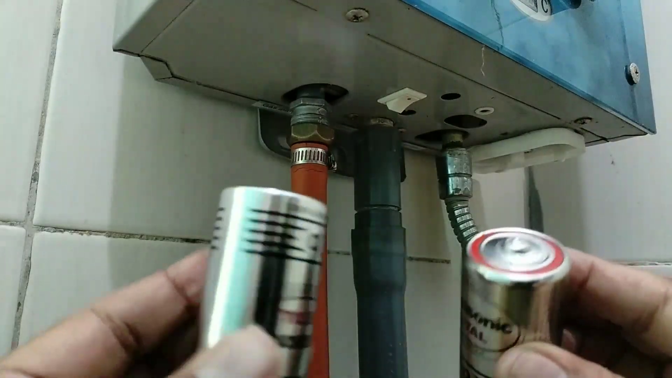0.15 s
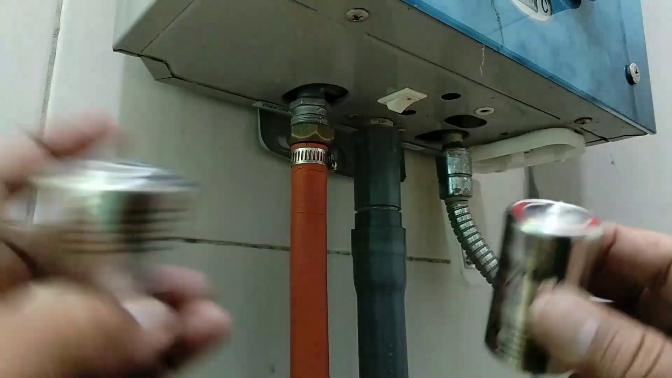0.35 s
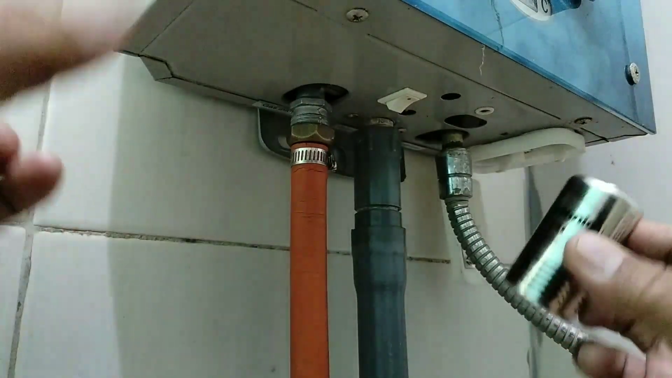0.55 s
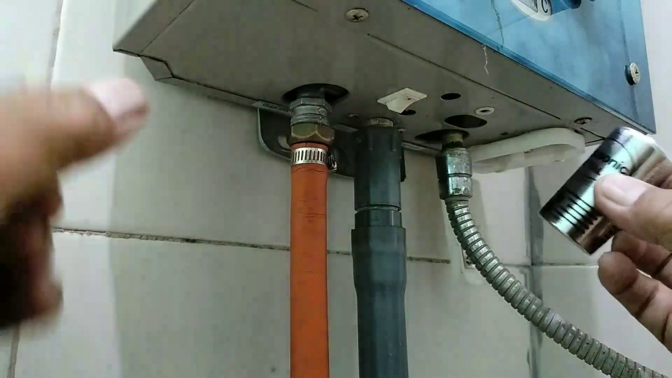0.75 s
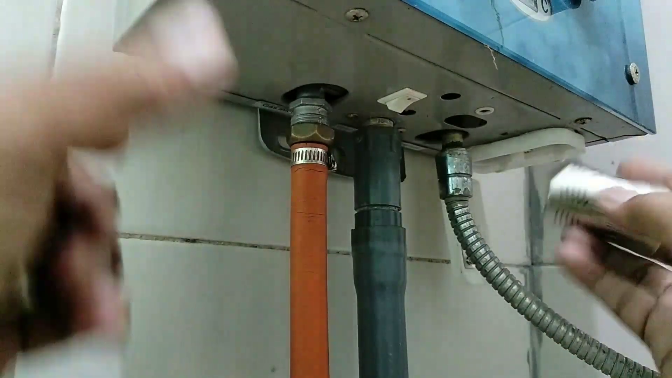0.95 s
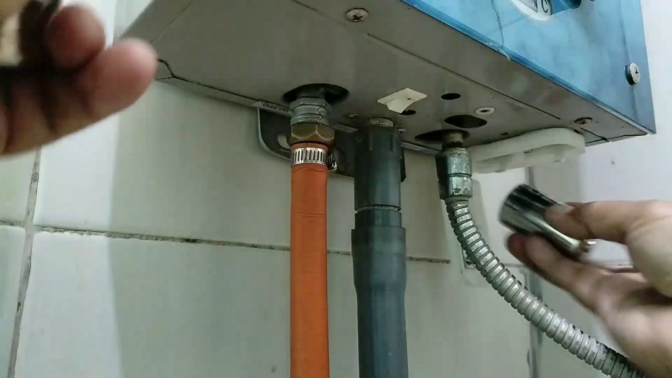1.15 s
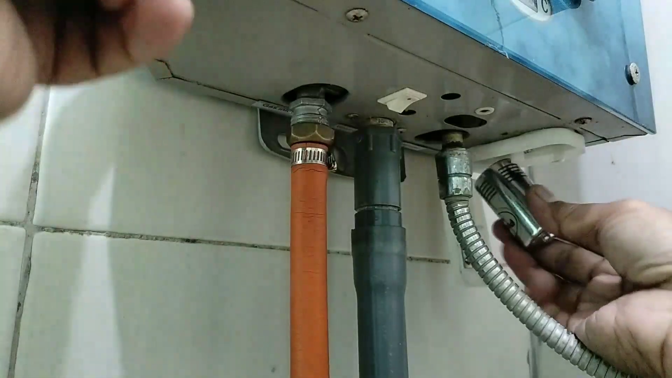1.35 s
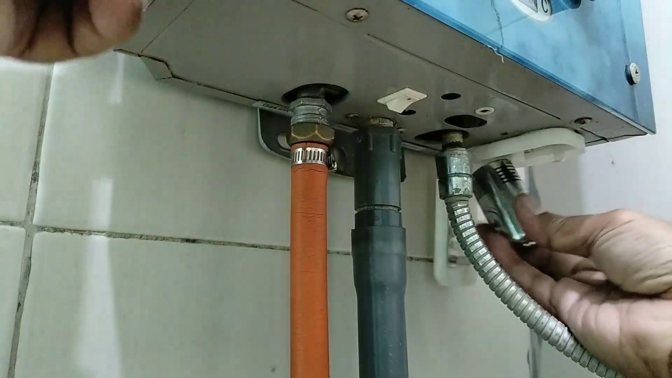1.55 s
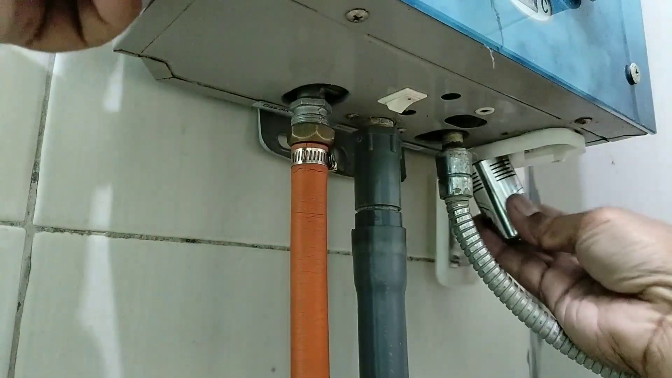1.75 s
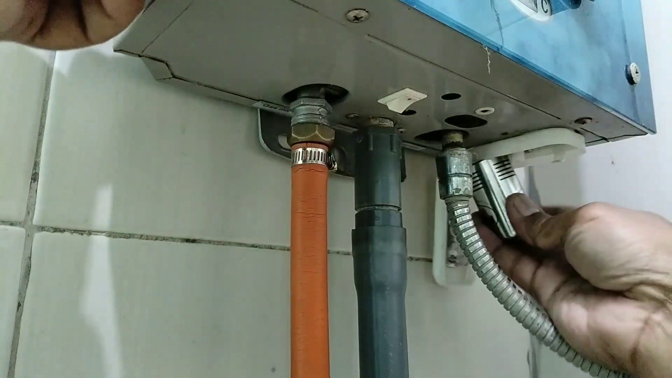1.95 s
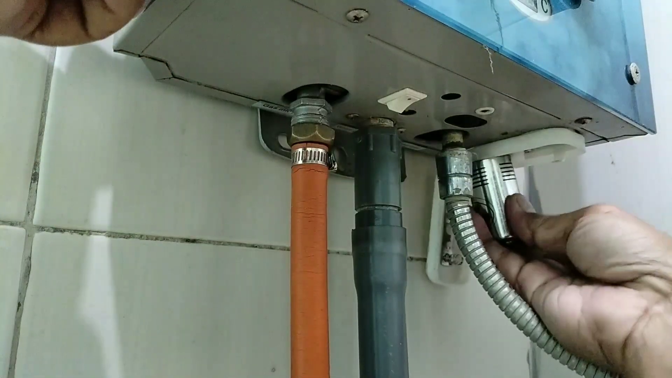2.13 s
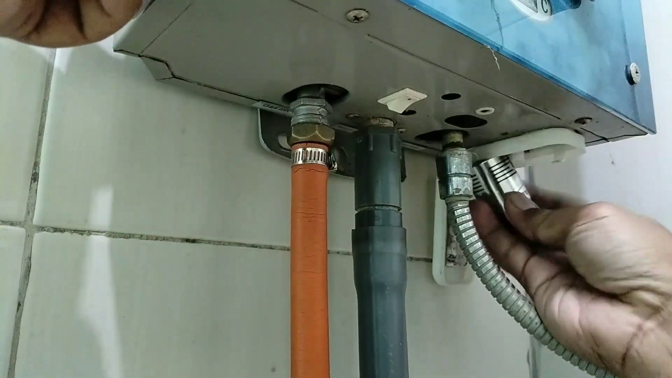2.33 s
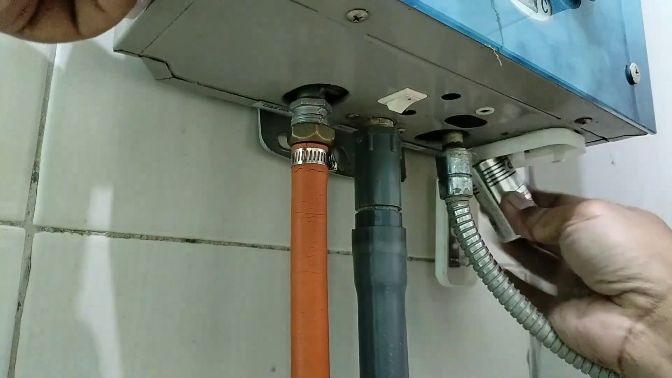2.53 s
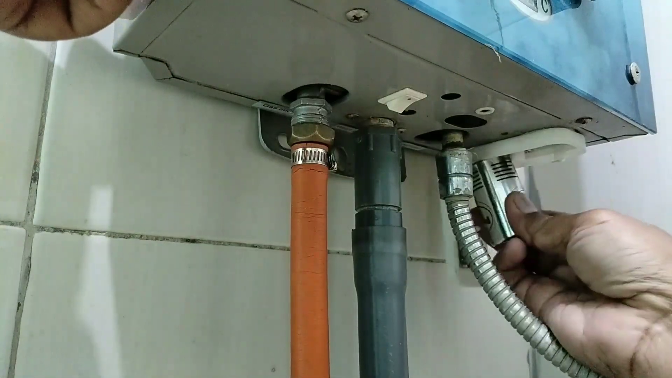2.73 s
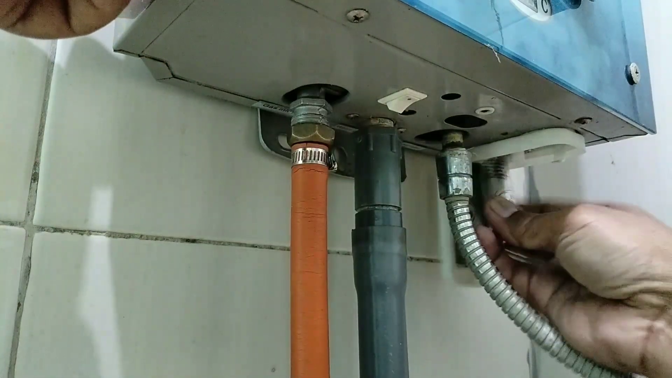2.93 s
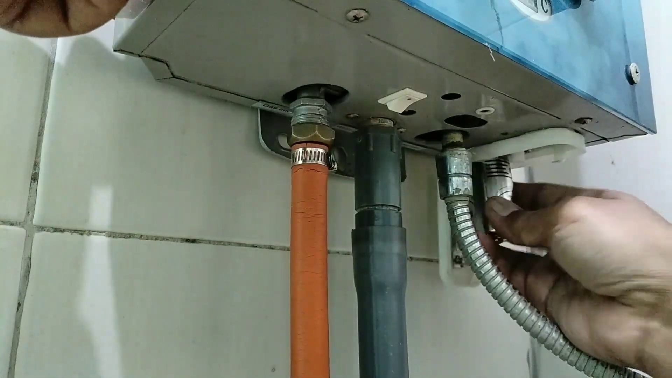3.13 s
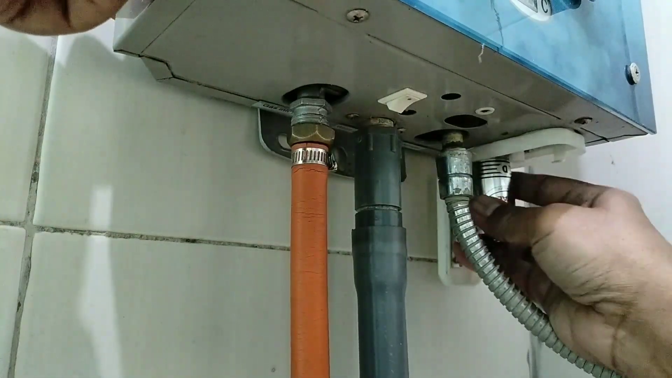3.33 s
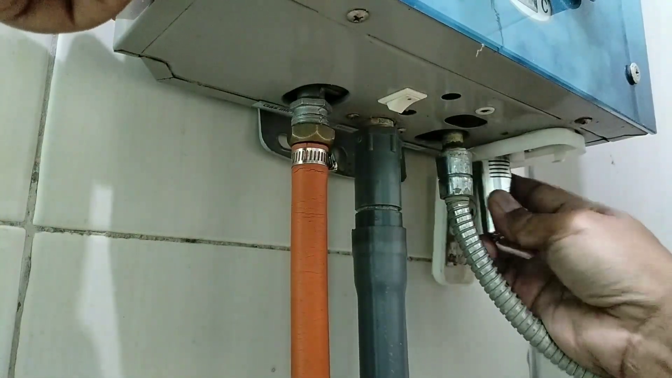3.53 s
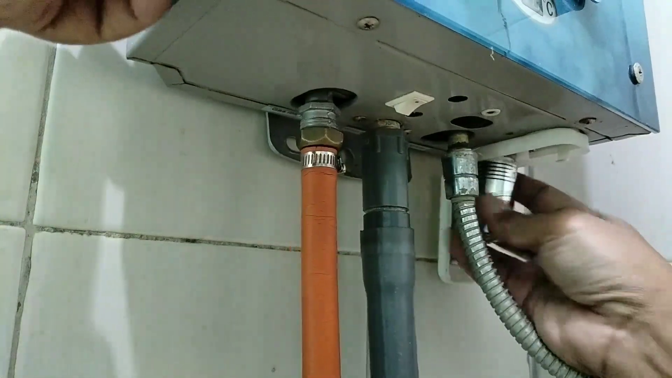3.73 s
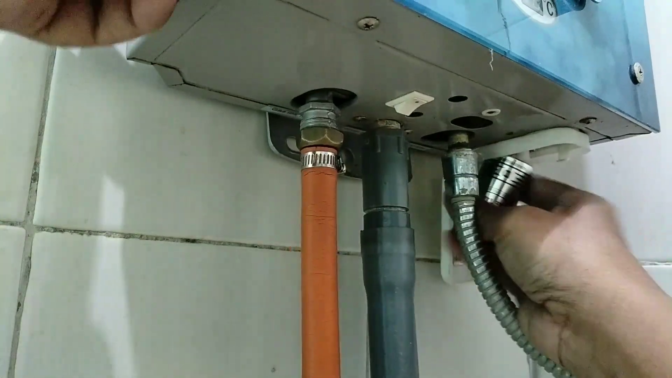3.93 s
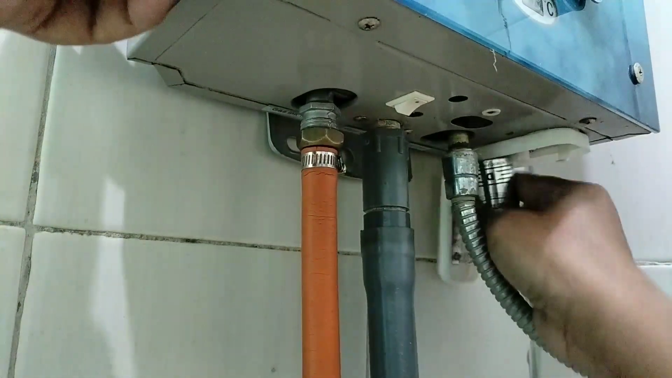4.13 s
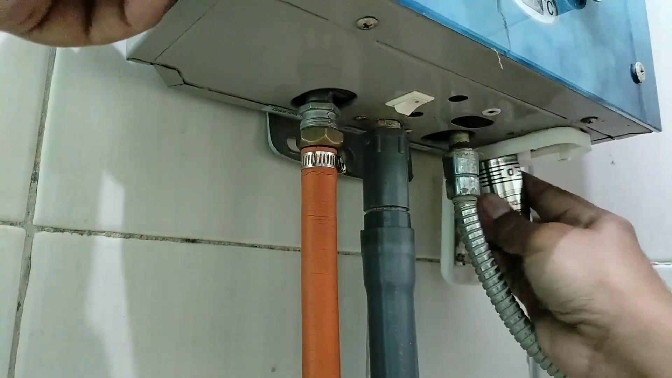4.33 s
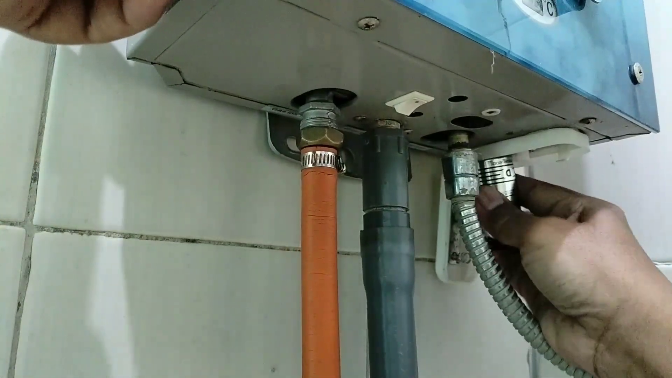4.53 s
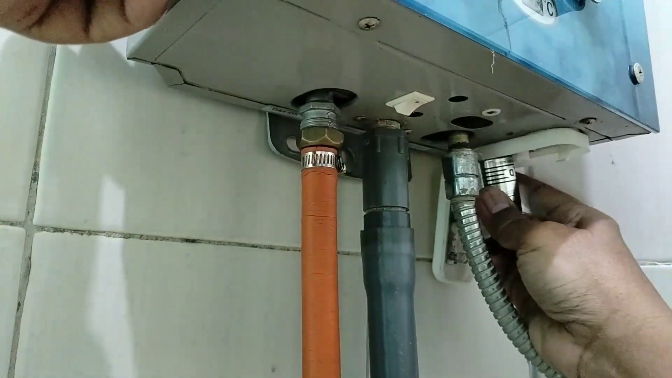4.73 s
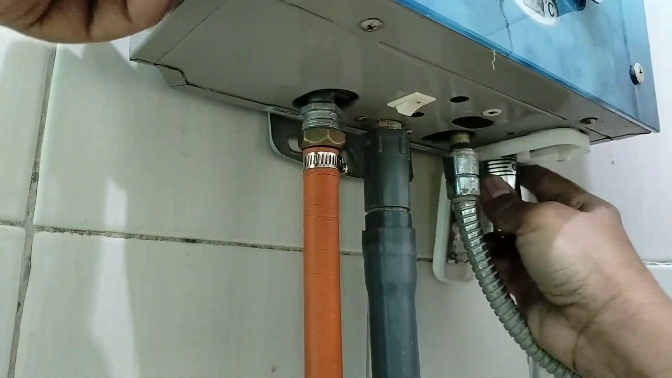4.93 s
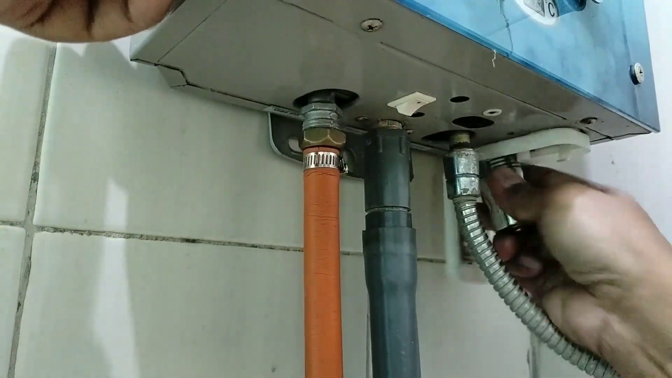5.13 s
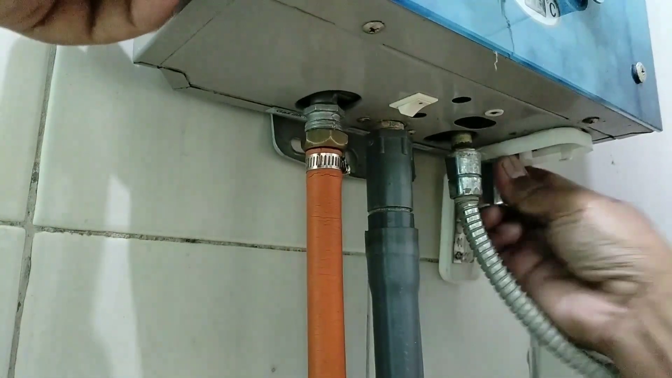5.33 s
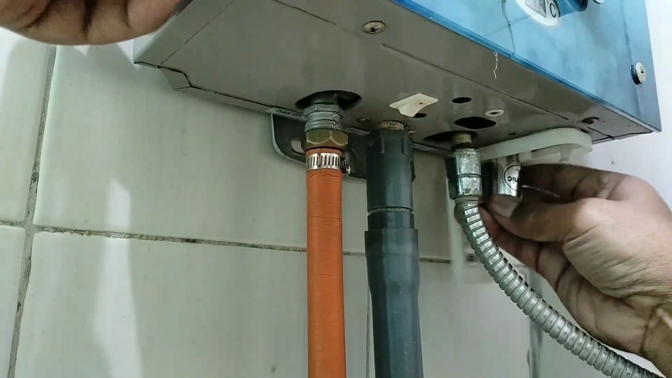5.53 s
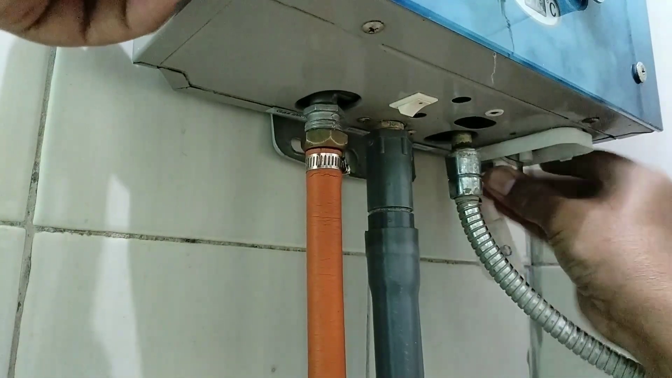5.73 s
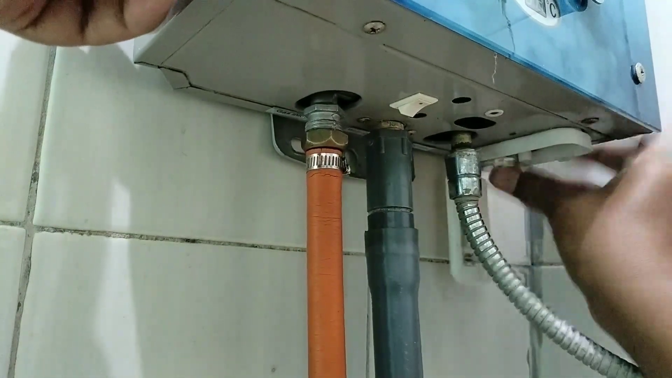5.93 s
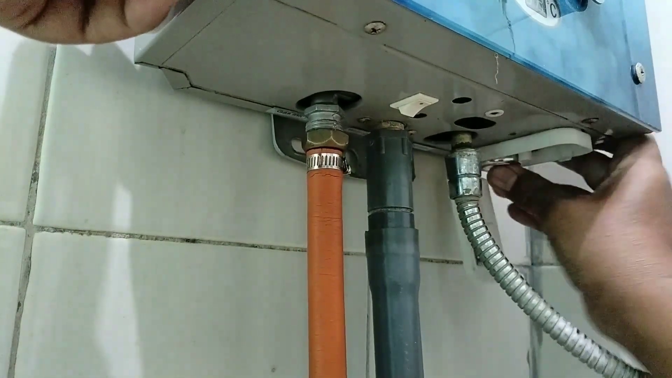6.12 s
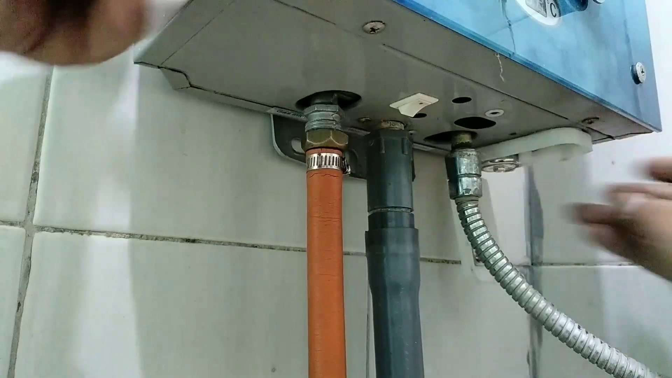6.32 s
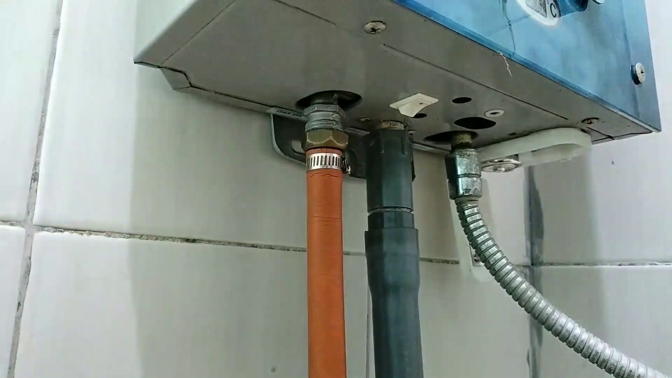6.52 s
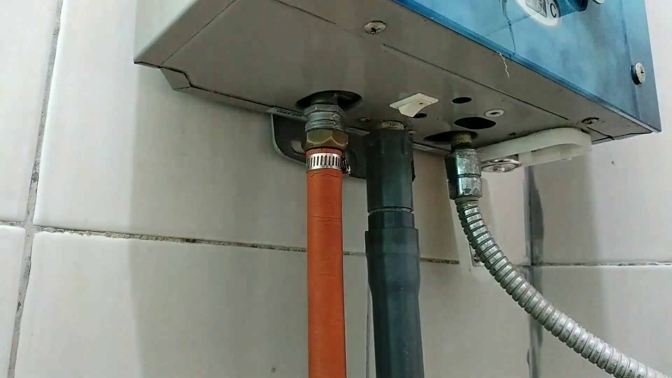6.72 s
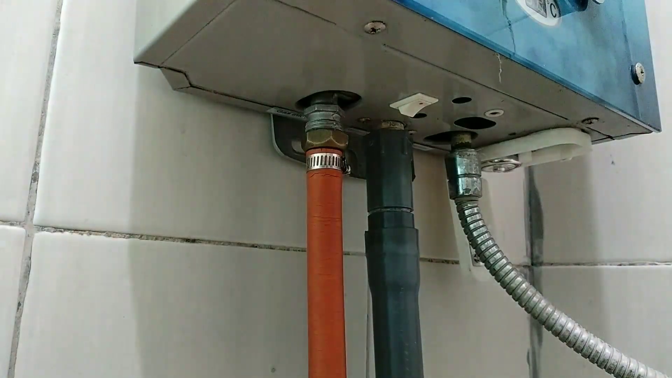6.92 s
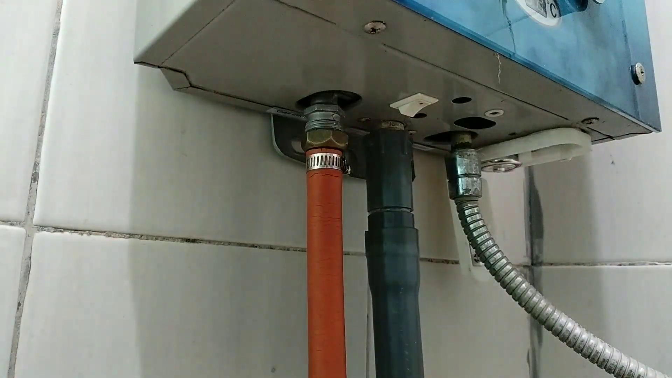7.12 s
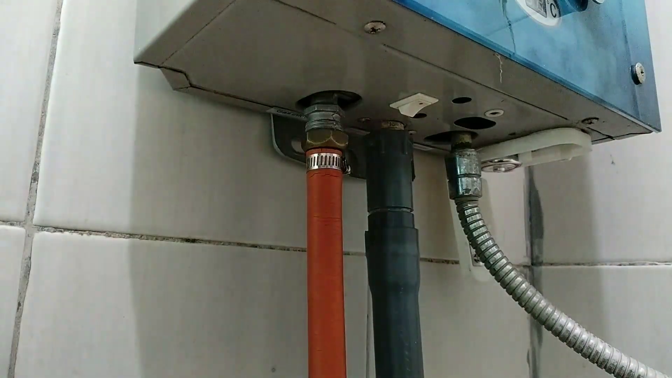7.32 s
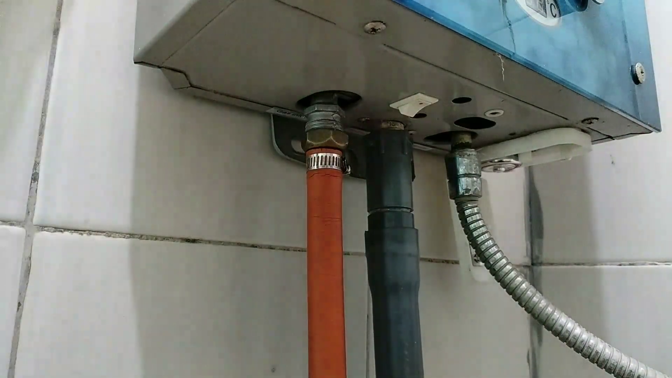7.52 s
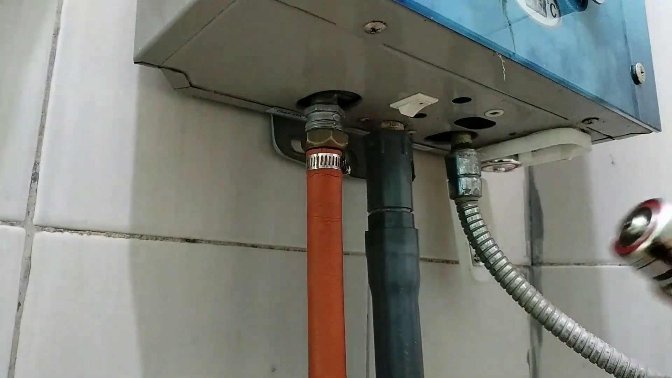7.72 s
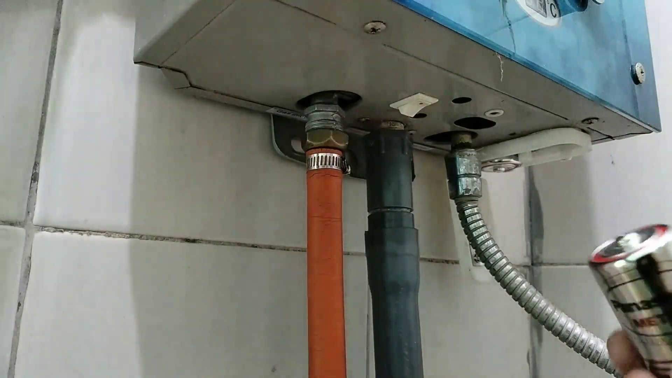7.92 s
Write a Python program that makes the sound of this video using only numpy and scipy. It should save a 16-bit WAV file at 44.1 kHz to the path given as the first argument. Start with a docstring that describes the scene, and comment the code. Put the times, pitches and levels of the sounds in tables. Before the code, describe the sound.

Metal-cased batteries knock, scrape and clatter into a plastic holder under a wall-mounted water heater, over a faint low motor hum in a tiled room.

```python
"""A motor hums throughout as metal-cased batteries go into the plastic holder of a wall-mounted water heater.
A first scrape at 1.1 s leads to bursts of knocks from 1.5 s, as the casing panel booms in slow swells.
From about 3 s steel cans glint and two squeaks sound amid more scrapes, clatter and small contact ticks.
Something hard rocks to rest after 6.5 s, and one faint tick follows at 7.7 s, all in a small tiled room.
Chattering contact forces drive plastic, metal and room responses; stick-slip clicks make the scrapes."""
import sys
import numpy as np
from scipy import signal
from scipy.fft import rfft, irfft, next_fast_len
from scipy.io import wavfile
from scipy.ndimage import uniform_filter1d

SR = 44100
rng = np.random.default_rng(int(sys.argv[2]) if len(sys.argv) > 2 else 0)


def inscribe(sig):
    """Save sig as 16-bit PCM at rate SR to the path in sys.argv[1].

    A 1-D sig is mono; a 2-D sig holds one channel per row.
    Samples are clipped to [-1, 1] before scaling.
    """
    pcm = np.round(np.clip(np.atleast_2d(sig).T, -1, 1) * 32767)
    wavfile.write(sys.argv[1], SR, pcm.astype(np.int16))


N = 355754
TIME = np.arange(N) / SR
RING = TIME[:SR]  # one second of time for each ringing sound
EARLY = int(.027 * SR)  # early part of the room's response, 27 ms [samples]


def undb(db):
    """Decibels to gain."""
    return 10 ** (np.asarray(db) / 20)


def at(points, hz):
    """Reads (frequency, value) points on a log-frequency axis."""
    f, value = np.transpose(points)
    return np.interp(np.log(np.maximum(hz, 1)), np.log(f), value)


def add(out, s, sound):
    """Mixes a sound in at time s."""
    i = int(s * SR)
    out[..., i:i + sound.shape[-1]] += sound[..., :N - i]


def response(points, size=2048):
    """Minimum-phase impulse response with the given (frequency, dB) colour."""
    log_gain = np.log(undb(at(points, np.fft.rfftfreq(size, 1 / SR))))
    cepstrum = irfft(log_gain)
    cepstrum[1:size // 2] *= 2  # folding the cepstrum makes the response causal
    cepstrum[size // 2 + 1:] = 0
    return irfft(np.exp(rfft(cepstrum)))


def convolve(x, h):
    """Convolution along time, cut to the length of x."""
    return signal.fftconvolve(np.atleast_2d(x), np.atleast_2d(h))[:, :x.shape[-1]]


def unit(x):
    """Scales to unit energy."""
    return x / np.sqrt(np.sum(x ** 2))


def decay(t60):
    """Exponential decay that falls 60 dB in t60 seconds."""
    return np.exp(-np.log(1000) * RING / t60)


def walk(rate):
    """Smooth random wander with a spread near 1, from fresh values drawn at the given rate [Hz]."""
    k = int(SR / rate)
    steps = np.repeat(rng.standard_normal(N // k + 1), k)
    return 1.3 * uniform_filter1d(uniform_filter1d(steps, k), k)[:N]


def diffuse(size, wide_hz=850):
    """Spectrum of a diffuse field at two close microphones: the bass is alike in both."""
    hz = np.fft.rfftfreq(size, 1 / SR)
    mid, side = rfft(rng.standard_normal((2, size)))
    width = np.clip(hz / wide_hz, .2, 1) ** 0.91
    return hz, (mid + np.array([[1], [-1]]) * width * side) / np.sqrt(1 + width ** 2)


# colour of the room noise: (frequency [Hz], relative density [dB per Hz])
NOISE_COLOUR = [(20, -8.5), (45, -9), (65, -17.5), (100, -10), (125, -28), (170, -15), (260, -18),
                (360, -29.5), (720, -32), (1250, -35), (1800, -41.5), (2450, -39.5), (2900, -44.5),
                (3350, -41.5), (4200, -50.5), (8000, -58.5), (15000, -63)]
NOISE_DB = -55


def air():
    """Quiet, dark room noise: a diffuse random field with a falling spectrum."""
    hz, field = diffuse(next_fast_len(N))
    noise = irfft(field * undb(at(NOISE_COLOUR, hz)) * (hz > 15))[:, :N]
    return noise / noise.std() * undb(NOISE_DB + .5 * walk(2.4))


# harmonics of the motor's shaft: (multiple of the shaft rate, level before waver [dB])
HUM = [(2, -59), (3, -52), (4, -95), (7, -62.5), (11, -82), (12, -58.5), (16, -67.5), (34, -83.5),
       (40, -79), (45, -81.5), (51, -77.5), (58, -81)]
SHAFT_HZ = 13.6


def motor(whirr_db=-59, swing_hz=68, waver_db=1, throb=0.31, order=15):
    """Shaft harmonics, and a whirr whose pitch and level rise and fall once a turn."""
    turn = 2 * np.pi * np.cumsum(SHAFT_HZ * (1 + 0.0011 * walk(2.077))) / SR
    lines = 0
    for k, db in HUM:
        k = round(k)
        lines = lines + undb(db + waver_db * walk(2.76)) * np.sin(k * turn + k ** 2)  # k ** 2 spreads the phases
    whirr = np.sin(order * turn + swing_hz / SHAFT_HZ * np.sin(turn)) * (1 - throb * np.cos(turn))
    return np.sqrt(2) * (lines + undb(whirr_db + waver_db * walk(65)) * whirr)


# the hand presses on the casing and its large panel booms: (time of the peak [s], level [dB])
PRESSES = [(1.68, -55.5), (2.12, -42.5), (2.87, -44.5), (3.97, -52), (4.23, -50), (4.73, -51), (5.6, -42.5),
           (6.3, -54)]
PRESS_RISE_S, PRESS_FALL_S, PANEL_REST_DB = 0.063, 0.052, -64.5


def panel(panel_hz=91, waver=0.0241):
    """The casing panel's lowest mode, wavering in pitch, swells as the hand works against it."""
    swell = undb(PANEL_REST_DB)
    for s, db in PRESSES:
        swell = swell + undb(db) * np.exp(np.minimum((TIME - s) / PRESS_RISE_S, (s - TIME) / PRESS_FALL_S))
    pitch = panel_hz * (1 + waver * walk(9.8))
    return np.sqrt(2) * swell * np.sin(2 * np.pi * np.cumsum(pitch) / SR)


# decay of the tiled room: (frequency [Hz], t60 [s])
ROOM_T60 = [(150, 1), (400, 0.9), (1000, 0.62), (2800, 0.39), (7000, 0.22), (14000, 0.23)]


def room(build_s=0.00035, early=1.0, early_s=0.039, grain_db=3, grain_s=0.025, size=18):
    """A diffuse tail that decays at its own rate in each band, stronger and grainier at first."""
    hz, field = diffuse(SR)
    centres = np.log([f for f, _ in ROOM_T60])
    tail = 0
    for pick, (_, t60) in zip(np.eye(len(centres)), ROOM_T60):
        band = irfft(field * np.interp(np.log(hz + 1), centres, pick), SR)
        tail = tail + band * decay(t60)
    # early echoes differ in strength, in grains of a few samples
    spread = np.log(undb(grain_db)) * np.exp(-RING / grain_s)
    grains = np.repeat(rng.standard_normal(SR), size)[:SR]
    tail *= np.exp(spread * grains - spread ** 2)
    tail *= (1 - np.exp(-RING / build_s)) * (1 + early * np.exp(-RING / early_s))
    return tail / np.sqrt(np.sum(tail[:, :EARLY] ** 2, axis=1, keepdims=True))


def contact(ms, first=2, rise=0.25, size=2048):
    """Force of one contact: a first touch, then a spray of dying micro-bounces, a few of them strong."""
    age = RING[:size] * 1000 / max(ms, .1)  # in chatter times
    bounces = rng.choice([-1, 1], size) * rng.random(size) ** 12
    force = unit(bounces * (1 - np.exp(-age / rise)) * np.exp(-age))
    force[0] += first / np.sqrt(1 + abs(ms))
    return unit(force)


# taps of a hard object rocking to rest: (time [s], relative level [dB], hardness [dB per octave])
TAPS = [(6.556, -47, -4.5), (6.635, -47.5, 1.5), (6.699, -52, 3), (6.752, -57, -1), (6.797, -54.5, 1),
        (6.846, -59, 1.5), (6.888, -64, 0)]
# colour of each tap: (frequency [Hz], relative level [dB])
ROCKING_COLOUR = [(200, 2.5), (600, -11), (850, -1.5), (980, -5), (1130, 6.5), (1400, -9), (1900, -10),
                  (2250, -1.5), (2650, -8.5), (3200, -11), (4200, -20.5), (6500, -29), (12000, -59)]
# modes of the rocking object: (nominal frequency [Hz], relative level [dB], t60 [s])
ROCKING_MODES = [(840, -18, .15), (1135, -9, .15), (2280, -8, .12), (4770, -23, .08)]
# knocks: weight acts fully below the first frequency;
# in knocks and taps, hardness tilts all treble above the second
WEIGHT_HZ, HARDNESS_HZ = 366, 974


def rocking(ring_db=-10, chatter_ms=1.6, shift=0.014):
    """Light hollow taps, roughly closer and closer together, each ringing at a slightly different pitch."""
    out = np.zeros(N)
    for s, db, hardness in TAPS:
        pitch = 1 + shift * rng.standard_normal()
        ring = 0
        for hz, mode_db, t60 in ROCKING_MODES:
            ring = ring + undb(mode_db) * np.sin(2 * np.pi * hz * pitch * RING) * decay(t60)
        colour = [(hz, band_db + hardness * np.log2(max(hz / HARDNESS_HZ, 1)))
                  for hz, band_db in ROCKING_COLOUR]
        tap = unit(signal.fftconvolve(contact(chatter_ms), response(colour)))
        add(out, s, undb(db) * np.sqrt(EARLY) * tap)
        add(out, s, undb(db + ring_db) * ring)
    return out


# a battery's steel can rings when its rim is caught: (time [s], lowest mode [Hz], relative level [dB])
CAN_RINGS = [(3.099, 5200, -55), (4.305, 4750, -47), (5.401, 5240, -50), (5.473, 4760, -47),
             (5.604, 4760, -57), (5.875, 5140, -49.5)]
# modes of the can, in close pairs: (multiple of the lowest, relative level [dB], t60 [s])
CAN_MODES = [(1, -1.5, 0.13), (1.04, 3, .08), (2.8, -11, .09), (2.89, -11, .11)]


def cans(rise_s=0.00042):
    """The short, bright glint of a steel can; its close pairs of modes beat together."""
    out = np.zeros(N)
    for s, hz, db in CAN_RINGS:
        ring = 0
        for ratio, mode_db, t60 in CAN_MODES:
            mode = np.sin(2 * np.pi * (hz * ratio * RING + rng.random()))
            ring = ring + undb(mode_db) * mode * decay(t60)
        add(out, s, undb(db) * ring * (1 - np.exp(-RING / rise_s)))
    return out


# short squeaks of metal on plastic: (time [s], starting pitch [Hz], relative level [dB], t60 [s])
SQUEAKS = [(3.303, 4300, -56.5, 0.098), (3.818, 3390, -51, 0.06)]


def squeaks(click_db=9, click_ms=5):
    """Brief rough chirps that start with a tick and sag in pitch as the slip slows."""
    rough, fall_per_s = .06, .35
    out = np.zeros(N)
    for s, hz, db, t60 in SQUEAKS:
        pitch = hz * (1 + rough * walk(1500)[:SR]) * np.exp(-fall_per_s * RING)
        chirp = np.sin(2 * np.pi * np.cumsum(pitch) / SR) * decay(t60)
        add(out, s, 2 * undb(db) * chirp)
        add(out, s, undb(db + click_db) * contact(click_ms))
    return out


def envelope(start, hold, attack_s, release_s):
    """Rises from the start, holds, then dies away."""
    age = np.maximum(TIME - start, 0)
    return (1 - np.exp(-age / attack_s)) * np.exp(-np.maximum(age - hold, 0) / release_s)


# a battery is slid against the plastic: (start [s], length before release [s], relative level [dB])
STROKES = [(1.085, 0.039, -60.5), (2.57, 0.79, -63.5), (3.295, 0.48, -72.5), (3.864, 0.11, -53),
           (4.22, 0.34, -61), (4.98, 0.16, -57.5), (5.395, 0.18, -49), (5.77, 0.23, -54),
           (6.362, 0.076, -62)]
# colour of the rubbing: (frequency [Hz], relative level [dB])
SLIDE_COLOUR = [(100, -12.5), (330, 11.5), (600, -1), (1100, 1.5), (2400, -11), (4500, -17), (9000, -27.5),
                (15000, -33)]
STROKE_ATTACK_S, STROKE_RELEASE_S = 0.057, 0.08


def sliding(slips_per_s=1500, spread_db=4.0, uneven_db=4.0):
    """Stick-slip clicks, random in time, sign and strength, as a battery is eased along the holder."""
    clicks = (rng.random(N) < slips_per_s / SR) * rng.choice([-1, 1], N)
    slips = clicks * undb(spread_db * rng.standard_normal(N))
    rub = convolve(slips, response(SLIDE_COLOUR))[0]
    effort = sum(undb(db) * envelope(s, length, STROKE_ATTACK_S, STROKE_RELEASE_S)
                 for s, length, db in STROKES)
    return rub / rub.std() * effort * undb(uneven_db * walk(30))


# a battery or the lid strikes the holder: (time [s], relative level [dB], weight in the bass [dB],
# hardness [dB per octave], chatter [ms], frequency favoured by the struck spot [Hz])
KNOCKS = [(1.51, -31.5, -4.5, -5, 4, 247), (1.517, -38.5, -7, -3.5, 1.4, 247),
          (1.527, -31, -17, -15.5, 3.3, 1075), (1.582, -40.5, 4.5, -2.5, 2.1, 247),
          (1.715, -40, 2, -4.5, 2.1, 473), (1.804, -35, -7.5, -3, 2.5, 1075),
          (1.813, -31.5, -10, -10, 8.3, 473), (1.826, -42.5, -4, -7, 1.9, 613),
          (1.852, -48, 1, -2, 2.9, 505), (1.942, -44, 0, -1.5, 1.9, 2285), (1.951, -40, 3.5, -2, 6.3, 247),
          (2.056, -50, -5, -5, 6.7, 2285), (2.748, -41, 6.5, -2.5, 5.5, 835),
          (2.838, -55, 5, -5.5, 3.3, 3220), (2.923, -55, 8.5, -0.5, 1.4, 734),
          (3.007, -50, -9, -4.5, 4.6, 2285), (3.0993, -49, 4.5, 1.5, 1.54, 1870),
          (3.177, -38.5, -1.5, -3, 1.2, 2540), (3.213, -52.5, -0.5, -11, 5.9, 1355),
          (3.333, -55, 5, -2.5, 1.6, 2410), (3.428, -51.5, -3, -3, 4.3, 2285),
          (3.534, -59, 4.5, -7.5, 2.5, 2410), (3.86, -44.5, -12.5, -3, 1.9, 2540),
          (4.065, -38, -0.5, -5.5, 2.1, 179), (4.0722, -31.5, 1, -1.2, 1.6, 785),
          (4.078, -28.5, -5, -6.5, 2, 179), (4.092, -41, -11, -7, 5, 1355),
          (4.107, -39.5, -1, -14, 1.7, 935), (4.305, -48, 8.5, 3, 6.6, 4755),
          (4.314, -38.5, -3, -3.5, 2.9, 247), (4.409, -44, -1.5, -5, 1.14, 1355),
          (4.643, -42.5, -18, -5, 1.9, 2410), (4.68, -55.5, 3.5, -0.5, 14, 935),
          (5.029, -61, 7, -2.5, 5, 1730), (5.104, -52.5, -3, -10, 1.6, 1245),
          (5.413, -50.5, 3, 0.5, 7.4, 302), (5.435, -29, -6.5, -7, 1.44, 473),
          (5.452, -40.5, -9, -2.5, 4.4, 1145), (5.472, -38.5, -2, -7, 3.1, 473),
          (5.51, -36.5, -28, -2.5, 1.7, 2540), (5.522, -46.5, -15, -1, 4, 1145),
          (5.648, -53.5, -5, -6, 3, 473), (5.723, -59, -7, -6.5, 3, 2410),
          (5.793, -52.5, -2, -1.5, 3.8, 302), (5.875, -49.5, 3.5, 3, 1, 1145),
          (6.158, -53.5, 1, 0.5, 1.8, 2410), (6.168, -41.5, 0, -3.5, 6.9, 1145)]
# a metal end touches a spring contact: (time [s], relative level [dB], chatter [ms])
TICKS = [(1.95, -54, 0.84), (2.244, -67.5, 2.3), (2.509, -65.5, 1.6), (2.744, -54, 0.77),
         (3.447, -60.5, 1.1), (4.033, -59, 0.74), (4.273, -65, 12), (4.304, -52, 1.1), (4.959, -59, 3.5),
         (5.05, -66, 14), (5.15, -69, 24), (5.402, -51.5, 0.64), (5.415, -57, 0.53), (5.427, -51, 0.56),
         (5.473, -45, 1.7), (5.48, -53.5, 0.7), (5.604, -53.5, 1.6), (5.8748, -47.5, 0.92),
         (7.723, -69.5, 14)]
# fingers and soft pushes bump the holder: (time [s], relative level [dB], chatter [ms])
BUMPS = [(2.508, -53.5, 4.1), (2.563, -50.5, 11), (2.742, -38.5, 3.5), (3.453, -47, 4.2), (4.098, -46, 4.1),
         (5.102, -48.5, 2.2), (5.213, -51, 8.1), (5.831, -43.5, 26), (6.215, -44, 15)]
# force of each kind of contact: (frequency [Hz], relative level [dB per octave band])
KNOCK_FORCE = [(1100, 1), (3500, 3.5), (9500, -11), (14000, -9)]
TICK_FORCE = [(360, -4), (1100, 0), (2800, -2), (4400, 6.5), (9500, -4.5), (14000, -0.5)]
BUMP_FORCE = [(360, 1.5), (1100, -10), (3500, -11.5), (9500, -33.5)]
# straight sound over sound sent into the room: a snap of 1 ms or less, the loss per doubling of chatter, a bump
SNAP_DIRECT_DB, DIRECT_LOSS_DB, BUMP_DIRECT_DB = -3, 8.5, -1
TICK_DIRECT_DB = 3  # spring contacts are more direct still


def blows():
    """Every contact as (s, force spectrum, chatter ms, direct dB, favoured Hz); weight and hardness tilt knocks."""
    hz = np.geomspace(360, 14000, 10)
    bass = at([(WEIGHT_HZ, 1), (HARDNESS_HZ, 0)], hz)
    octaves = np.maximum(np.log2(hz / HARDNESS_HZ), 0)

    def force(colour, db):
        return np.column_stack([hz, at(colour, hz) + db])

    def direct_db(ms):
        return SNAP_DIRECT_DB - DIRECT_LOSS_DB * np.log2(max(ms, 1))

    knocks = [(s, force(KNOCK_FORCE, db + weight * bass + hardness * octaves), ms, direct_db(ms), spot_hz)
              for s, db, weight, hardness, ms, spot_hz in KNOCKS]
    ticks = [(s, force(TICK_FORCE, db), ms, direct_db(ms) + TICK_DIRECT_DB, None) for s, db, ms in TICKS]
    bumps = [(s, force(BUMP_FORCE, db), ms, BUMP_DIRECT_DB, None) for s, db, ms in BUMPS]
    return knocks + ticks + bumps


# modes of casing and holder: (nominal frequency [Hz], level relative to the blow [dB])
MODES = [(179, -9.5), (247, -5.5), (302, 2), (334, 0), (374, -8), (473, 0.5), (505, -6.5), (558, -11),
         (613, -7), (734, -10.5), (785, -11), (835, -11.5), (935, -31), (982, -11.5), (1075, -12.5),
         (1102, -6.5), (1145, -8), (1190, -11), (1245, -8.5), (1355, -10), (1620, -18), (1730, -10.5),
         (1870, -11), (2130, -18), (2235, -10.5), (2285, -5.5), (2410, -8), (2540, -10.5), (3220, -7),
         (4755, -8)]
# the sheet metal rings longest in the low middle: (frequency [Hz], nominal t60 [s])
MODE_T60 = [(180, .42), (300, .48), (480, .36), (1100, .3), (1700, .21), (2400, .15), (4800, .14)]


def casing(ring_db=-2.0, favour_db=9.5, scatter_db=2.5, grip_detune=0.0113, rise_s=0.0016, wide_hz=900):
    """Every blow rings the same modes, in a mix set by its force, chance and any favoured spot."""
    out = np.zeros((2, N))
    hz, mode_db = np.transpose(MODES)
    t60 = at(MODE_T60, hz)
    held = hz > 1200
    rings = np.exp((2j * np.pi * hz[:, None] - np.log(1000) / t60[:, None]) * RING)
    rings = rings * (1 - np.exp(-RING / rise_s))
    # short waves reach the two microphones with different phases
    phase = np.minimum(hz / wide_hz, 1) ** 2 * (2 * rng.random(len(hz)) - 1)
    ports = np.exp(1j * np.outer([1, -1], phase))
    ports = ports * np.exp(2j * np.pi * rng.random(len(hz)))  # each mode has its own path through the air
    for s, force, _, _, spot_hz in blows():
        blow_db = at(force, hz) + scatter_db * rng.standard_normal(len(hz))
        if spot_hz:
            blow_db[np.argmin(abs(hz - spot_hz))] += favour_db
        weights = ports * undb(blow_db + mode_db + ring_db)
        add(out, s, ((weights * ~held) @ rings).imag)
        # the upper modes belong to parts in the hand: each grip detunes them a little
        stretch = 1 + grip_detune * rng.standard_normal()
        upper = ((weights * held) @ rings).imag
        add(out, s, np.array([np.interp(RING * stretch, RING, ring) for ring in upper]))
    return out


# colour of the dense, quickly damped plastic clatter: (frequency [Hz], relative level [dB])
CLATTER_COLOUR = [(60, -13), (140, -32), (300, -3.5), (600, -7), (1100, -1.5), (1550, -6), (2350, 0),
                  (2850, -4.5), (4000, -4), (5200, 1), (8500, 4), (9350, 3), (10300, 3.5), (14200, 0.5),
                  (16000, -2)]


def clatter(clatter_db=-2.14):
    """The plastic holder's broad response to each contact, as sent into the room and straight to the microphones."""
    out = np.zeros((2, N))
    for s, force, ms, direct_db, _ in blows():
        hz, band_db = force.T
        # from octave-band level to spectral density, over the early part of the room's response
        colour = np.column_stack([hz, band_db + 10 * np.log10(EARLY * SR / 2 / hz)])
        burst = signal.fftconvolve(contact(ms), response(colour))
        add(out, s, np.outer(unit(undb([0, direct_db])), burst))
    return undb(clatter_db) * convolve(out, response(CLATTER_COLOUR))


def scene(rub_room_db=-4, rub_direct_db=-2, rocking_db=-1, can_room_db=-6):
    """Handling noises in the room, over the hum; the rocking object is heard only by way of the walls."""
    into_room, straight = clatter()
    rubbing = sliding() + squeaks()
    glints = cans()
    sent = into_room + undb(rub_room_db) * rubbing + undb(can_room_db) * glints
    echoes = convolve(sent, room())
    corner = undb(rocking_db) * convolve(rocking(), room(early=1.2, early_s=0.032))
    direct = straight + glints + undb(rub_direct_db) * rubbing
    return air() + motor() + panel() + corner + echoes + direct + casing()


TOP_HZ = 15600


def record(dry, balance_db=-0.63):
    """The left microphone is slightly weaker; a steep low-pass cuts the top."""
    gains = undb(np.array([[balance_db], [-balance_db]]) / 2)
    low_pass = signal.ellip(8, .2, 70, TOP_HZ, fs=SR, output="sos")
    return signal.sosfilt(low_pass, dry * gains)


dry = scene()
out = record(dry)
inscribe(out)
```